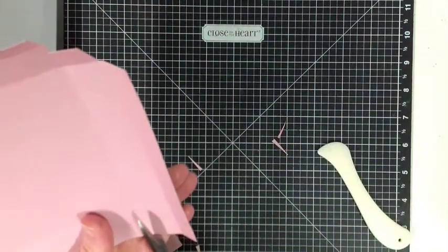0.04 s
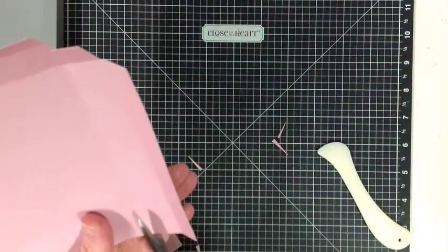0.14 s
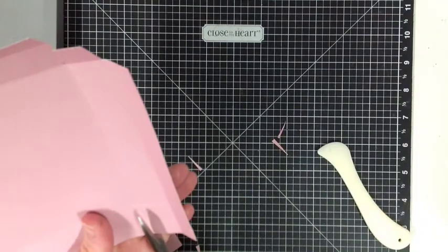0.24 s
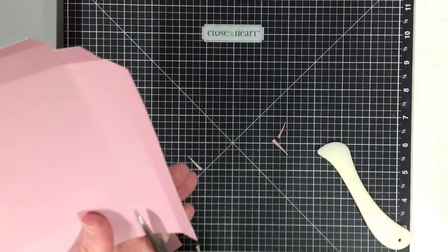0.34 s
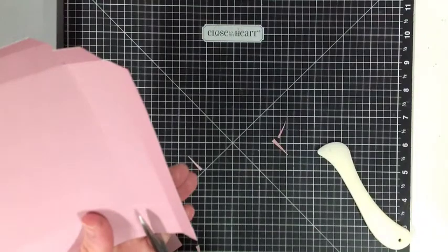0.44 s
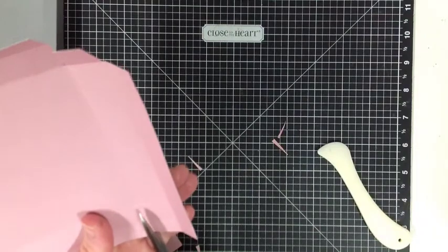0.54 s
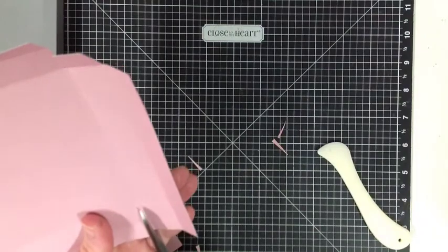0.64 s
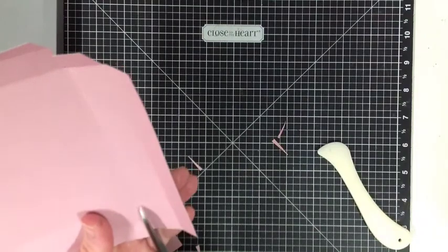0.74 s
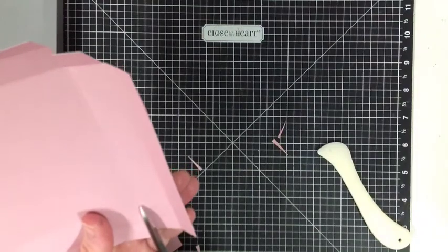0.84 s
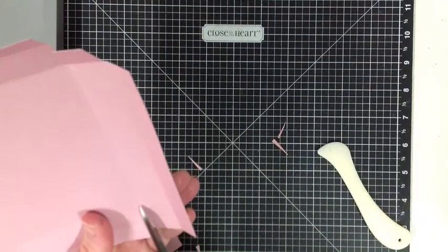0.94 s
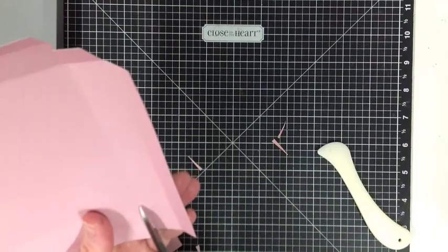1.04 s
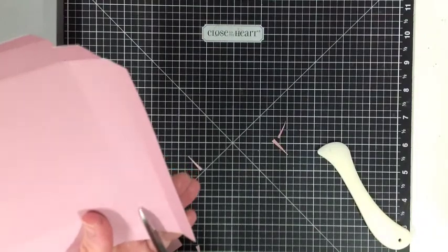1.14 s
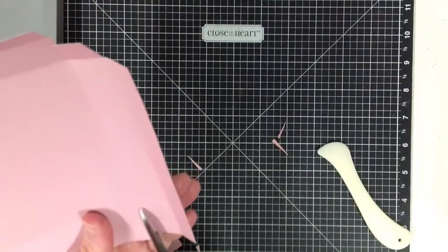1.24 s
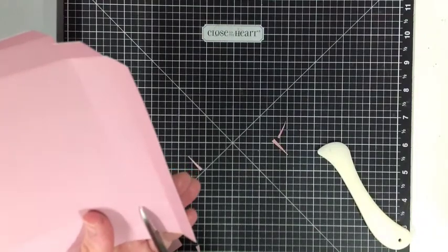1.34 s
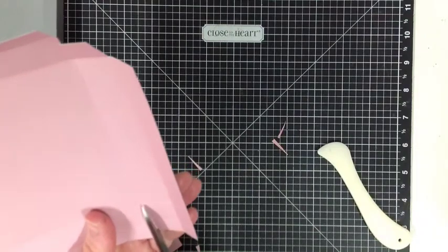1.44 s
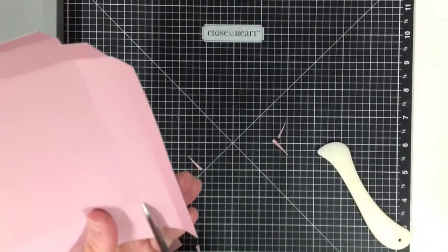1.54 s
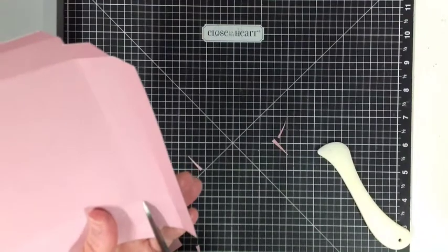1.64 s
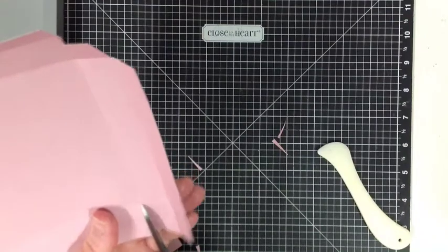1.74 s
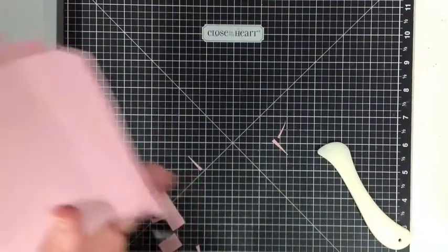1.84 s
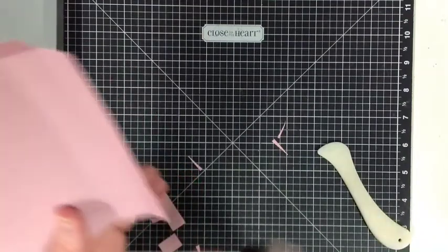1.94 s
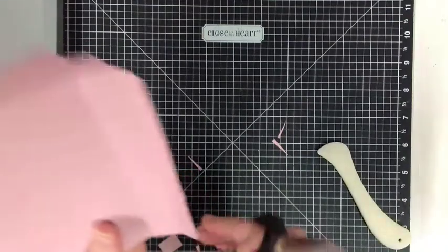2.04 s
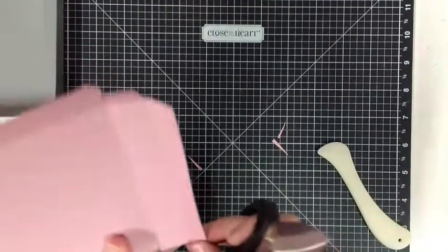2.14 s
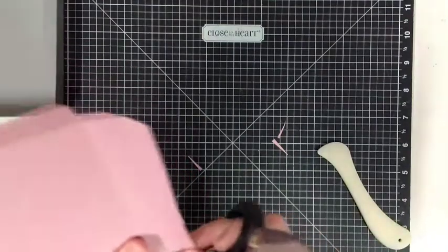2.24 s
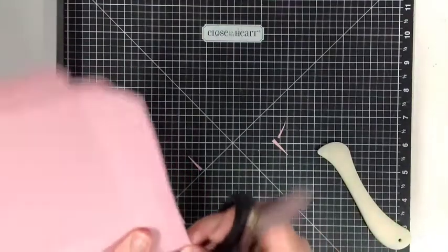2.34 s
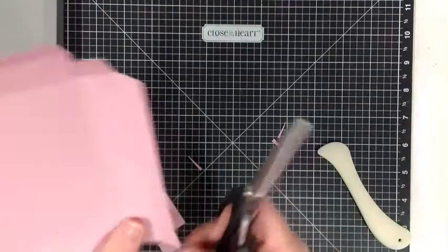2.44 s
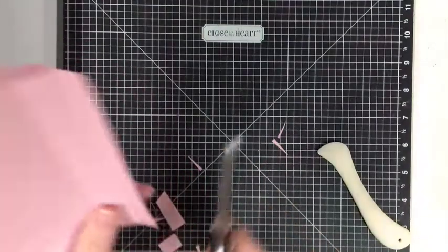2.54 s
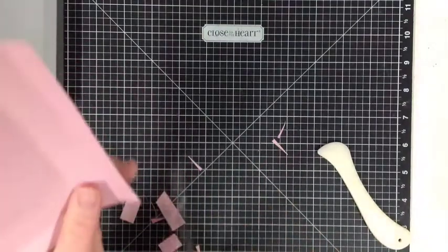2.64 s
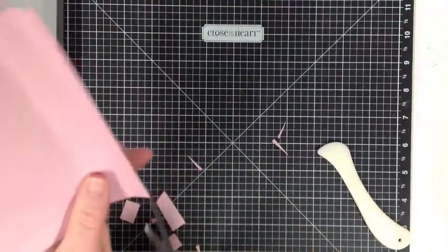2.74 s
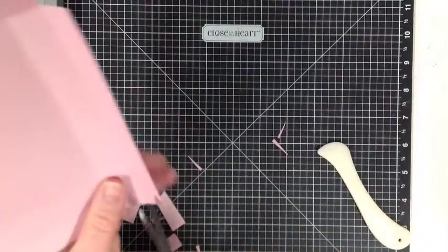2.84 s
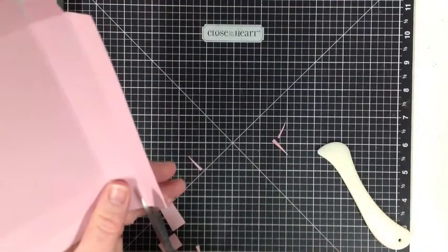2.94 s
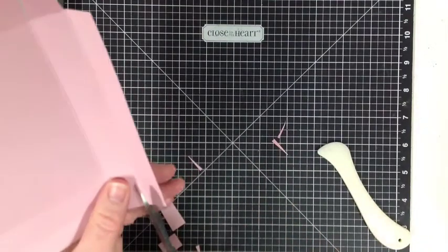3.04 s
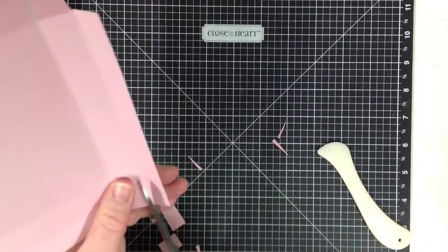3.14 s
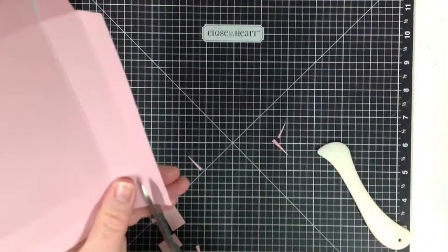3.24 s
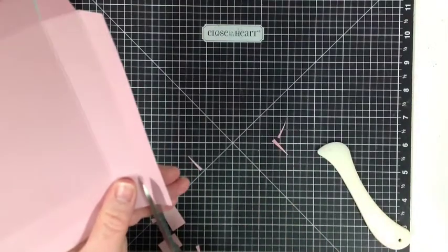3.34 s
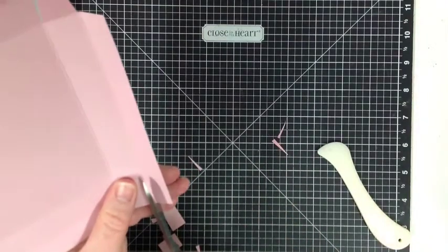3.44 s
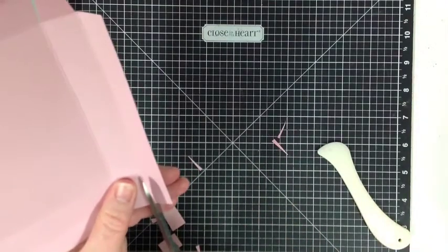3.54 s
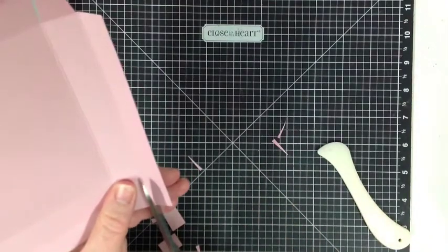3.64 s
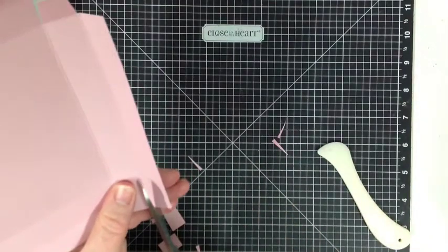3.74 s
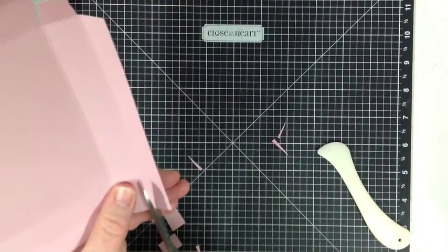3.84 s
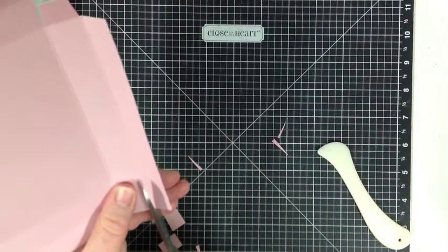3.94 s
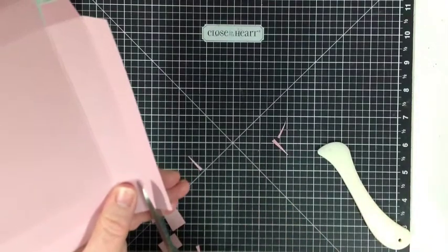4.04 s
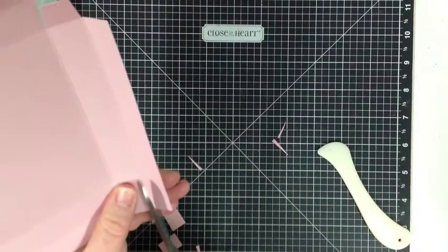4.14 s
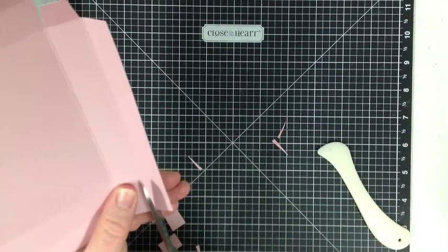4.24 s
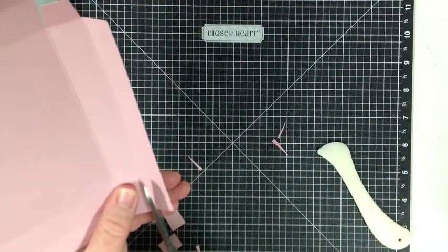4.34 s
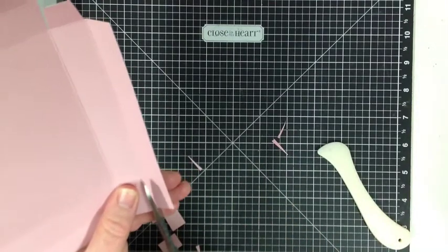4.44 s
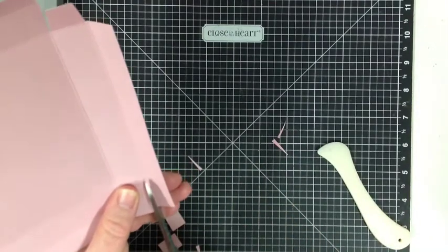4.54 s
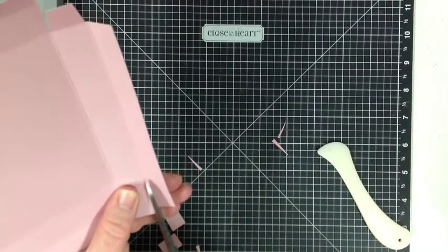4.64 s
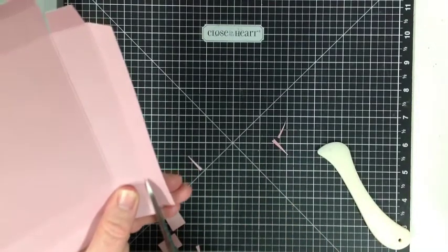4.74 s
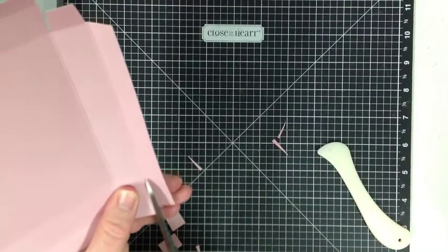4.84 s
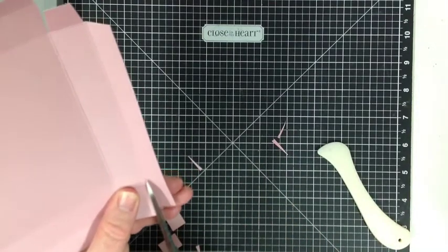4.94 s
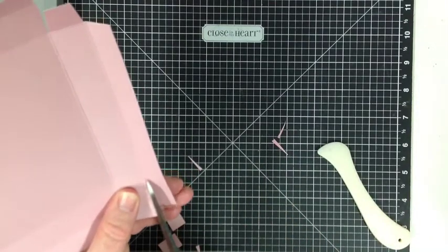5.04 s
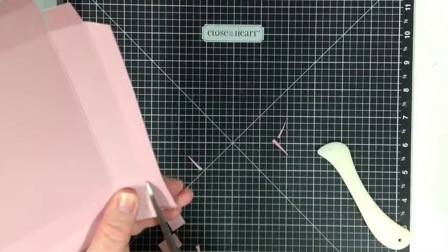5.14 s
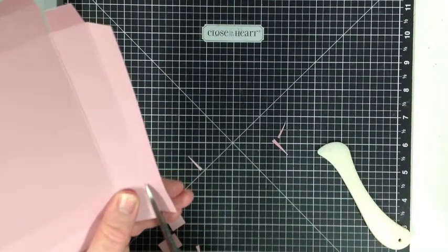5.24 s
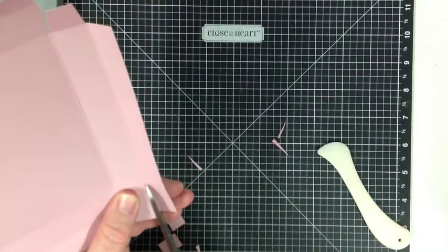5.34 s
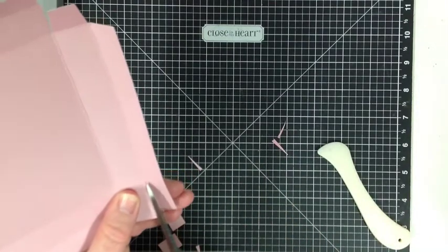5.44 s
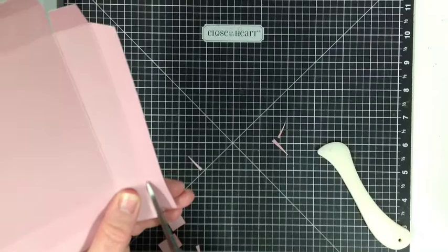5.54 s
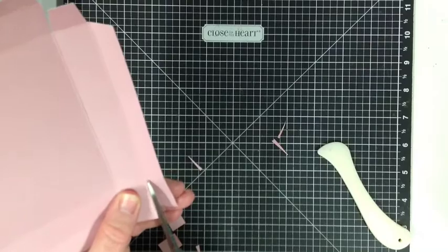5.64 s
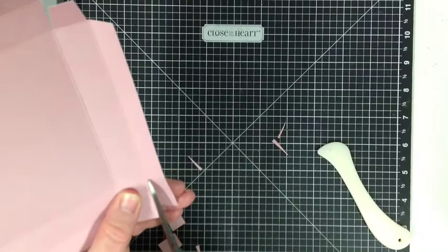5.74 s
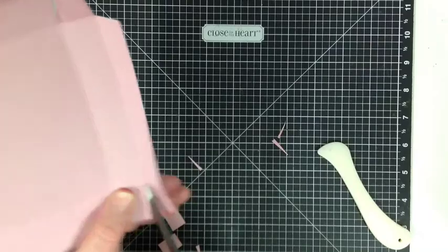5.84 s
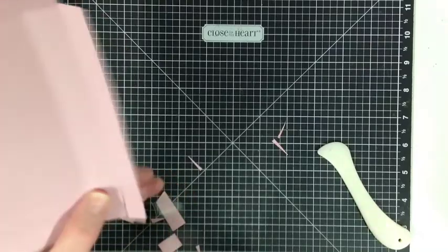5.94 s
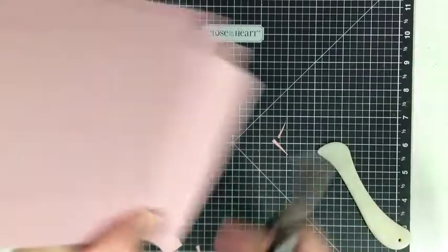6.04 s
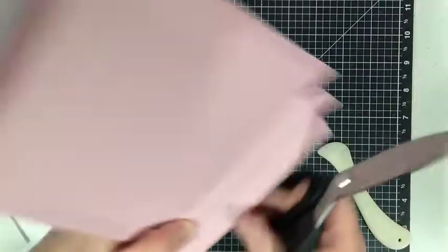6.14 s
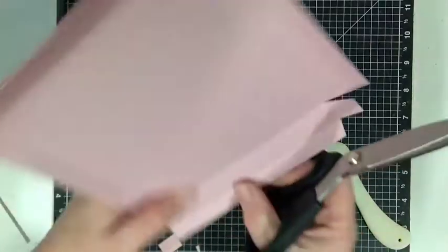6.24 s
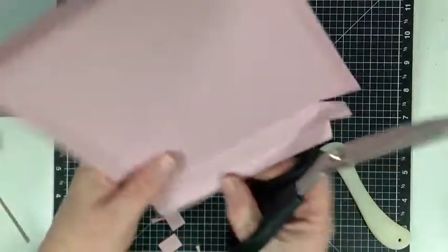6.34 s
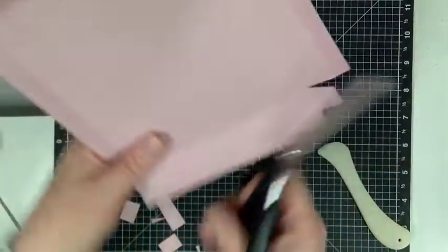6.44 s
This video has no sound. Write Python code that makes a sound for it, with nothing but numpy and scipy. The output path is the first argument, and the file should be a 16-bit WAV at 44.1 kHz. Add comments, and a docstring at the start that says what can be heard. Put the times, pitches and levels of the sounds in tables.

```python
"""A craft table in a small, quiet room, where scissors snip a sheet of card stock.
The blades drag in the slit and advance in jerks, each tearing a bundle of fibres; some cuts end
with a clack and a faint ring of steel. In between, steel and fingers slide along the card, the steel
squeaks as it slips, and the stiff sheet creaks and pops as it is turned. Under it all lie room air,
hiss and a low rumble that swells towards the end."""
import sys
import numpy as np
from scipy import signal
from scipy.fft import rfft, irfft
from scipy.io import wavfile
from scipy.ndimage import uniform_filter1d

SR = 44100
rng = np.random.default_rng(int(sys.argv[2]) if len(sys.argv) > 2 else 0)


def wav_record(signal):
    """Record a signal, one row per channel, as 16-bit PCM in the file named by sys.argv[1]."""
    frames = np.transpose(np.atleast_2d(signal))
    bounded = np.clip(frames, -1, 1)
    # unit amplitude maps onto the largest positive 16-bit level
    quanta = np.round(bounded * 32767).astype(np.int16)
    wavfile.write(sys.argv[1], SR, quanta)


N = 286209
TIME = np.arange(N) / SR
BODY_EDGE_HZ = 2200   # crossover between body and treble


def from_db(db):
    """Decibels to gain."""
    return 10 ** (np.asarray(db) / 20)


def unit_energy(x):
    """Scale so that the squares sum to one."""
    return x / np.sqrt(np.sum(x ** 2) + 1e-20)


def at_hz(points, hz):
    """Read a curve on a log-frequency axis."""
    known_hz, values = np.transpose(points)
    return np.interp(np.log(np.maximum(hz, 1)), np.log(known_hz), values)


def add(track, start_s, sound):
    """Mix a sound into a track at its cue."""
    at = int(start_s * SR)
    track[at:at + len(sound)] += sound[:N - at]


def through(x, response):
    """Pass a sound through an impulse response."""
    return signal.fftconvolve(x, response)[:N]


def band(x, hz, kind, order=2):
    """Butterworth filter."""
    return signal.sosfilt(signal.butter(order, hz, kind, fs=SR, output="sos"), x)


def resonate(x, hz, q, boost_db):
    """Lift a narrow band around one resonance."""
    return x + (from_db(boost_db) - 1) * signal.lfilter(*signal.iirpeak(hz, q, fs=SR), x)


def response_of(colour, size=4096):
    """The minimum-phase impulse response of an EQ curve."""
    gain = from_db(at_hz(colour, np.fft.rfftfreq(size, 1 / SR)))
    cepstrum = irfft(np.log(gain))
    cepstrum[1:size // 2] *= 2
    cepstrum[size // 2 + 1:] = 0
    return unit_energy(irfft(np.exp(rfft(cepstrum))))


def grains(count, per_s, spread_db):
    """Random micro-cracks, many small and a few large; rms 1."""
    sizes = from_db(spread_db * np.minimum(rng.exponential(1, count), 4))
    cracks = sizes * rng.choice([-1, 1], count) * (rng.random(count) < per_s / SR)
    return unit_energy(cracks) * np.sqrt(count)


def card(treble_drive, body_drive, colour):
    """The contact point radiates the treble, the whole sheet the body."""
    response = response_of(colour)
    treble = unit_energy(band(response, BODY_EDGE_HZ, "high", order=3))
    body = unit_energy(band(response, BODY_EDGE_HZ, "low", order=3))
    return through(treble_drive, treble) + through(body_drive, body)


def friction(strokes, colour, catches_per_s, spread_db, body_trim_db, uneven_db, slip_hz, stop_s=0.0115):
    """Strokes gather speed, hold and stop, catching on the fine tooth of the card: a dense hiss."""
    treble, body = np.zeros(N), np.zeros(N)
    for full_speed_s, run_up_s, hold_s, level_db, body_db in strokes:
        run_up = np.minimum((TIME - full_speed_s) / run_up_s, 0)
        stop = np.maximum(TIME - full_speed_s - hold_s, 0) / stop_s
        level = from_db(level_db) * np.exp(np.maximum(run_up - stop, -20))
        treble = np.maximum(treble, level)
        body = np.maximum(body, level * from_db(body_db + body_trim_db))
    catches = grains(N, catches_per_s, spread_db)
    stick_slip = np.interp(TIME * slip_hz, np.arange(4096), rng.standard_normal(4096))
    hiss = catches * from_db(uneven_db * stick_slip)
    return card(hiss * treble, hiss * body, colour)


def rings(modes, t):
    """One dying oscillation per mode, neighbours swinging in opposite directions."""
    hz, width_hz, level_db = np.transpose(modes)[:, :, None]
    sign = (-1) ** np.arange(len(modes))[:, None]
    decay = np.exp(-np.pi * width_hz * t)
    return sign * from_db(level_db) * width_hz * decay * np.sin(2 * np.pi * hz * t)


def impacts(hits, modes, chatter, contact_hz):
    """A contact and its chatter ring the modes; where it lands sets the low, mid and high share."""
    out, t = np.zeros(N), TIME[:int(.12 * SR)]
    register_of = np.searchsorted([650, BODY_EDGE_HZ], np.transpose(modes)[0])
    ringing = band(rings(modes, t), contact_hz, "low")
    # a small radiator sheds what lies under its own modes
    registers = [band(ringing[register_of == k].sum(axis=0), low_cut_hz, "high", order=3)
                 for k, low_cut_hz in enumerate([165, 450, 1600])]
    for start_s, chatter_s, *levels_db in hits:
        force = chatter * unit_energy(rng.standard_normal(len(t)) * np.exp(-t / chatter_s))
        force[0] += 1
        for register, level_db in zip(registers, levels_db):
            ring = unit_energy(signal.fftconvolve(force, register)[:len(t)])
            add(out, start_s, from_db(level_db) * ring * np.sqrt(.01 * SR))
    return out


# EQ curves of the air and of the rumble. Each row: frequency in Hz, relative level in dB.
AIR_COLOUR = [(25, -40), (60, -16), (100, -5.5), (180, 0.5), (300, -3), (500, -4.5), (800, -6.5),
              (1500, -10.5), (3200, -12), (4200, -14), (8000, -14.5), (15000, -16)]
RUMBLE_COLOUR = [(30, -27.5), (75, -10), (120, -12.5), (175, -0.5), (255, 0.5), (340, -14), (1000, -45.5)]
# The rumble's fader ride. Each row: time in seconds, level in dB.
RUMBLE_RIDE = [(0, -76.5), (4.35, -81), (4.6, -69.5), (6.49, -65)]


def room_tone():
    """A bed of steady room air and microphone hiss over a low rumble that swells late."""
    air = through(rng.standard_normal(N), response_of(AIR_COLOUR))
    rumble = through(rng.standard_normal(N), response_of(RUMBLE_COLOUR))
    ride_db = np.interp(TIME, *np.transpose(RUMBLE_RIDE))
    return from_db(-64.5) * air + from_db(ride_db) * rumble


# Squeezes of the scissors; the hold on the card gives each one its tone. Each row: start and end in
# seconds, relative drag level in dB, body against treble in dB, cut-edge and sheet resonances in Hz,
# sheen in dB.
SQUEEZES = [(0.38, 0.478, -68.5, -5, 3110, 1000, -4.5), (0.519, 0.621, -56.5, -5.5, 7500, 950, -3.5),
            (0.631, 0.755, -54, -2, 2250, 1380, -5.5), (0.84, 0.92, -61, 2, 3430, 1405, 3),
            (1.525, 1.633, -57, -3, 3090, 1015, -2), (2.373, 2.464, -57, -7.5, 3320, 1090, -5),
            (4.433, 4.634, -63, -6, 9900, 720, 0.5), (4.63, 4.857, -62.5, -5, 7000, 713, -2),
            (5.027, 5.081, -58, -5.5, 6300, 1217, -1), (5.586, 5.67, -71, -5.5, 6800, 1117, 3.5)]
# Jerks of the blades through the fibres. Each row: start and length in seconds, relative level in dB.
JERKS = [(0.386, 0.0089, -50.5), (0.416, 0.00667, -47.5), (0.449, 0.0135, -51), (0.475, 0.0066, -54),
         (0.523, 0.0173, -54), (0.55, 0.0054, -50.5), (0.567, 0.0202, -52), (0.633, 0.0109, -42.5),
         (0.665, 0.0079, -45.5), (0.686, 0.0069, -49), (0.7, 0.0158, -51), (0.728, 0.0083, -52),
         (0.749, 0.0101, -53.5), (0.84, 0.01344, -45.5), (0.863, 0.0088, -47), (0.877, 0.0108, -49),
         (0.892, 0.0083, -46.5), (0.91, 0.0052, -53), (0.936, 0.0071, -61), (1.526, 0.00563, -45.5),
         (1.533, 0.00695, -48.5), (1.549, .003, -52.5), (1.563, 0.01005, -41), (1.59, 0.02975, -42),
         (1.631, 0.0055, -34), (2.396, 0.0046, -42.5), (2.4619, 0.00307, -31), (4.421, .009, -51.5),
         (4.455, 0.0119, -46.5), (4.5, 0.009, -44), (4.528, 0.0108, -48), (4.54, 0.0124, -50.5),
         (4.561, 0.014, -52), (4.579, 0.0146, -45), (4.6, 0.0134, -52), (4.622, 0.0039, -52),
         (4.643, 0.0192, -50.5), (4.667, 0.0225, -49.5), (4.693, 0.00804, -41.5), (4.712, 0.01, -46),
         (4.734, 0.0059, -49), (4.75, 0.0052, -44.5), (4.777, 0.0143, -43.5), (4.808, 0.00686, -43.5),
         (4.831, 0.0079, -47), (4.842, 0.0051, -45), (5.035, 0.0143, -42), (5.054, 0.0197, -49.5),
         (5.072, 0.0068, -44), (5.082, 0.00524, -39.5), (5.61, 0.0063, -48.5), (5.637, 0.00796, -41),
         (5.666, 0.0087, -38.5)]
# Ticks and creaks of the handled card, and the bright snap of the scissors clacking shut at 1.85 s.
# Each row: start and length in seconds, relative level in dB, body against treble in dB.
TICKS = [(1.816, 0.0058, -39.5, -8), (1.8505, 0.00275, -27, -10), (2.177, 0.00583, -47.5, -1),
         (3.566, 0.00344, -58.5, -16.5), (3.735, 0.027, -66.5, 0.5), (4.359, 0.0023, -55.5, -5),
         (5.206, 0.0159, -63, -2), (5.459, 0.0103, -63.5, -1), (5.888, 0.008, -39, -9.5),
         (6.182, 0.0178, -47, -0.5), (6.3152, 0.0021, -36, 0), (6.322, 0.00275, -36, -9.5),
         (6.332, 0.0049, -33.5, -7.5), (6.468, 0.00405, -53, 3)]
# EQ curve of tearing fibres. Each row: frequency in Hz, relative level in dB.
TEAR_COLOUR = [(90, -28.5), (180, -9.5), (420, -1), (760, -7.5), (1000, 0.5), (1350, -1), (1900, -7),
               (2200, -4.5), (2700, -7.5), (3200, -7.5), (4300, -9.5), (5800, -7.5), (7400, -4.5),
               (9600, -9), (11500, -8.5), (15500, -13.5)]


def crackle(cracks_per_s, spread_db, rise_s, release_s, sag_db):
    """Each jerk breaks fibres in a burst that sags as the strain is spent; the ticks share its shape."""
    treble, body, t = np.zeros(N), np.zeros(N), TIME[:int(.06 * SR)]
    cues = []
    for start_s, length_s, level_db in JERKS:
        nearest = min(SQUEEZES, key=lambda squeeze: max(squeeze[0] - start_s, start_s - squeeze[1]))
        cues.append((start_s, length_s, level_db, *nearest[3:]))
    cues += [(*tick, 3660, 1805, 0.7) for tick in TICKS]   # edge Hz, sheet Hz, sheen dB
    for start_s, length_s, level_db, body_db, edge_hz, sheet_hz, sheen_db in cues:
        strain = (1 - np.exp(-t / rise_s)) * from_db(-sag_db * np.minimum(t / length_s, 1))
        envelope = strain * np.exp(-np.maximum(t - length_s, 0) / release_s)
        burst = unit_energy(envelope * grains(len(t), cracks_per_s, spread_db)) * np.sqrt(length_s * SR)
        edge = resonate(burst, edge_hz, q=2.94, boost_db=4.5)
        sheet = resonate(burst, sheet_hz, q=10.3, boost_db=6.5)
        add(treble, start_s, sheen(edge, sheen_db) * from_db(level_db))
        add(body, start_s, sheet * from_db(level_db + body_db))
    return card(treble, body, TEAR_COLOUR)


def sheen(x, level_db, shelf_hz=10500):
    """The angle of sheet and blades sends more or less of the top end to the microphone."""
    top = signal.sosfiltfilt(signal.butter(2, shelf_hz, "high", fs=SR, output="sos"), x, padtype=None)
    return x + (from_db(level_db) - 1) * top


def blade_drag(full_at_share=0.281, run_up_share=0.23):
    """The blades drag in the slit, building early in each squeeze and holding to its end."""
    strokes = []
    for start_s, end_s, drag_db, body_db, *_ in SQUEEZES:
        length_s = end_s - start_s
        full_s = start_s + full_at_share * length_s
        strokes.append((full_s, run_up_share * length_s, end_s - full_s, drag_db, body_db))
    return friction(strokes, TEAR_COLOUR, catches_per_s=2500, spread_db=4.0,
                    body_trim_db=1.5, uneven_db=2.5, slip_hz=162.24)


# Modes of the steel blades. Each row: pitch in Hz, bandwidth in Hz, relative level in dB.
BLADE_MODES = [(734, 18, 7.5), (1114.6, 45, 5.5), (1273, 19, -25), (1548, 31, 2.5), (2244, 25.3, -15),
               (3014, 40.4, 12.5), (2996, 68, -8), (3630, 46, -10), (3812, 36, 3), (6330, 30, -18),
               (7646, 54, 3), (8775, 35, 13)]


def blade_ring(drive):
    """Cutting and clacking both set the steel ringing."""
    return through(drive, unit_energy(rings(BLADE_MODES, TIME[:SR // 5]).sum(axis=0)))


# Strokes along the card. Each row: arrival at full speed, run-up and hold in seconds,
# relative level in dB, body against treble in dB before the trim.
SLIDES = [(1.185, 0.0106, 0.0724, -60.5, 0), (1.745, 0.0133, 0.0278, -55.5, -4),
          (1.843, 0.01683, 0.0098, -30, -3), (2.225, 0.0266, 0.0463, -50, -8.5),
          (2.3, 0.03, 0.0635, -50, -10), (2.458, 0.0257, 0.0045, -45, -8),
          (2.635, 0.0295, 0.045, -54.5, -7), (5.19, 0.029, 0.283, -74, 7),
          (5.886, 0.01146, 0.0143, -39.5, -3), (5.94, 0.0414, 0.0065, -40, -9.5),
          (5.99, 0.024, 0.17, -63.5, -2.5), (6.198, 0.0057, 0.0072, -44, 2.5),
          (6.268, 0.0433, 0.061, -47, -9), (6.385, 0.028, 0.0071, -41, 0.5),
          (6.427, 0.025, 0.0184, -46, -3)]
# EQ curve of rubbed card. Each row: frequency in Hz, relative level in dB.
RUB_COLOUR = [(90, -25.5), (200, -5), (380, 4), (560, -7.5), (1000, -1), (1300, 1), (1900, -3.5),
              (2300, -2.5), (3300, -3), (4600, -3), (7500, -2.5), (11000, -5.5), (15500, -4)]


def card_rubs():
    """Steel and fingers slide over the card with a soft, fine-grained swish."""
    return friction(SLIDES, RUB_COLOUR, catches_per_s=22000, spread_db=2.5,
                    body_trim_db=-0.66, uneven_db=2.0, slip_hz=111.97)


# Pops of the sheet. Each row: start and chatter decay in seconds, relative low, mid and high in dB.
FLEXES = [(1.449, 0.0057, -53, -56, -63), (1.857, 0.0075, -35, -43.5, -49), (1.87, 0.0138, -29, -37, -58.5),
          (2.24, 0.0096, -47, -73.5, -63.5), (2.476, 0.0032, -49.5, -37, -56.5),
          (6.186, 0.0087, -50.5, -40.5, -46), (6.255, 0.001, -53.5, -47, -60),
          (6.2808, 0.0012, -42, -34.5, -40.5), (6.3685, 0.0061, -32.5, -36, -34.5),
          (6.3753, 0.00043, -35.5, -23, -49.5), (6.385, 0.011, -33, -41.5, -30.5),
          (6.3935, 0.0033, -42, -48, -35), (6.442, 0.02, -59.5, -42, -45)]
# Modes of the free sheet. Each row: pitch in Hz, bandwidth in Hz, relative level in dB.
SHEET_MODES = [(241, 39.6, -11.5), (328.4, 33.8, 3.5), (456, 59, 2.5), (693, 144, 2.5), (980, 290, 0.5),
               (1380, 285, -3), (1950, 816, -9), (2710, 390, -3.5), (3715, 660, -2), (5460, 1200, -24)]


def sheet_pops():
    """The stiff sheet flexes and knocks on the scissors, ringing its own modes."""
    return impacts(FLEXES, SHEET_MODES, chatter=0.97, contact_hz=5500)


# Blades closing. Each row: start and chatter decay in seconds, relative low, mid and high in dB.
SHUTS = [(1.638, 0.00156, -42.5, -28.5, -34), (1.852, 0.00466, -31, -29.5, -34.5),
         (2.4657, 0.00358, -32.5, -31.5, -34.5), (5.086, 0.0034, -64, -52.5, -73),
         (5.6755, 0.00162, -54.5, -35.5, -44.5)]
# Modes of the scissors with card in them. Each row: pitch in Hz, bandwidth in Hz, relative level in dB.
SCISSOR_MODES = [(178.7, 91, -5.5), (244, 74, -1.5), (352.5, 94, 0.5), (497.7, 136, -3), (720, 86, -15.5),
                 (909, 140.6, -2), (1146, 173, 3), (1369, 220, 0.5), (1628, 262, -6.5), (2014, 217, -15),
                 (3036, 396, -4), (3460, 376, -2), (4270, 630, -8.5), (6080, 1400, -13), (7520, 410, -6.5)]


def scissor_clacks():
    """The blades clack shut, a hard contact that rings the scissors and the held card."""
    return impacts(SHUTS, SCISSOR_MODES, chatter=1.14, contact_hz=9000)


# Slips of the steel. Each row: start and length in seconds, first and last pitch in Hz,
# relative level in dB.
SQUEAKS = [(1.837, .010, 3615, 5630, -53), (2.627, 0.013, 1156, 1453, -60), (2.623, .025, 7040, 6430, -61),
           (2.639, 0.0148, 3534, 3618, -61.5), (2.663, 0.0197, 1528, 980, -65.5),
           (5.884, 0.01234, 1675, 2520, -53.5), (5.932, 0.014, 5350, 5744, -49.5),
           (5.935, 0.0122, 10900, 11540, -46)]


def steel_squeaks(waver):
    """Short, unsteady stick-slip whistles that glide with the speed of the blade."""
    out = np.zeros(N)
    for start_s, length_s, first_hz, last_hz, level_db in SQUEAKS:
        count = int(length_s * SR)
        jitter = uniform_filter1d(rng.standard_normal(count), size=25)
        hz = np.linspace(first_hz, last_hz, count) * (1 + waver * jitter)
        swell = np.sin(np.linspace(0, np.pi, count))
        add(out, start_s, 2 * from_db(level_db) * swell * np.sin(2 * np.pi * np.cumsum(hz) / SR))
    return out


# The small room's short tail. Each row: frequency in Hz, time to fall 60 dB in seconds.
ROOM_T60 = [(150, 0.296), (400, 0.1496), (1000, 0.128), (3000, 0.1235), (7000, 0.13), (14000, 0.134)]


def room_reverb(send, build_s):
    """Diffuse reflections build up, then die at a rate of their own in each octave."""
    t, edges_hz = TIME[:int(.4 * SR)], np.geomspace(80, 18000, 9)
    tail = np.zeros(len(t))
    for low, high in zip(edges_hz, edges_hz[1:]):
        t60 = at_hz(ROOM_T60, np.sqrt(low * high))
        tail += band(rng.standard_normal(len(t)), [low, high], "band") * from_db(-60 * t / t60)
    fade_in = 1 - np.exp(-(t / build_s) ** 2)
    return through(send, unit_energy(tail * fade_in))


def scene():
    """The mono mix: cutting and handling up close, with a little room."""
    cracks = from_db(-2.0) * crackle(cracks_per_s=5000, spread_db=3.5, rise_s=0.00185,
                                     release_s=0.00245, sag_db=3.0)
    rubs = from_db(-2.2957) * card_rubs()
    drag = from_db(-1.74) * blade_drag()
    texture = cracks + rubs + drag + steel_squeaks(waver=0.175)
    clacks = from_db(0.45) * scissor_clacks()
    pops = from_db(-4.0) * sheet_pops()
    steel = from_db(-18.5) * blade_ring(cracks + drag + from_db(-5.5) * clacks)
    send = from_db(-12.5) * texture + from_db(-13.0) * (clacks + pops)
    reflections = room_reverb(send, build_s=0.0018)
    return (texture + clacks + pops + steel + reflections + room_tone())[None]


def record(dry):
    """The microphone sheds the deep bass; the top is cut steeply."""
    thin = band(dry, 77, "high", order=1)
    return signal.sosfilt(signal.ellip(10, .1, 70, 15450, fs=SR, output="sos"), thin)


dry = scene()
out = record(dry)
wav_record(out)
```